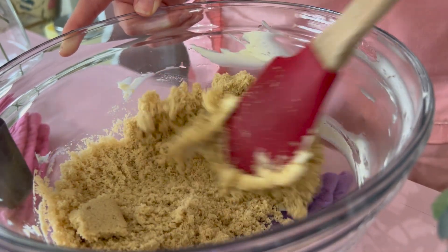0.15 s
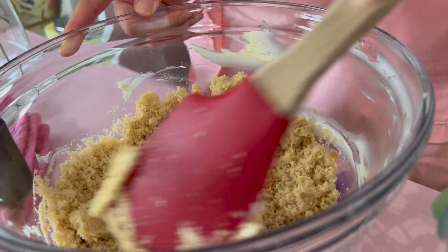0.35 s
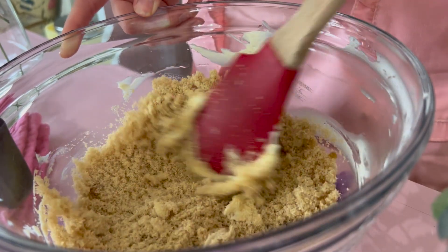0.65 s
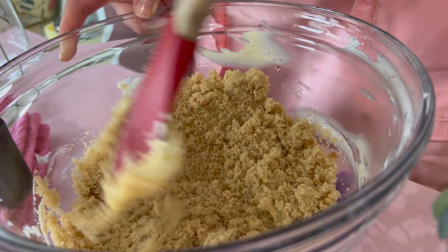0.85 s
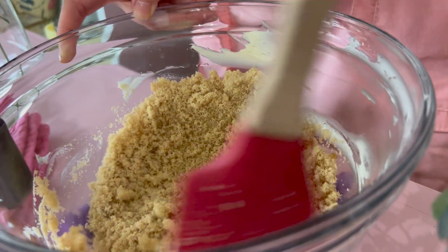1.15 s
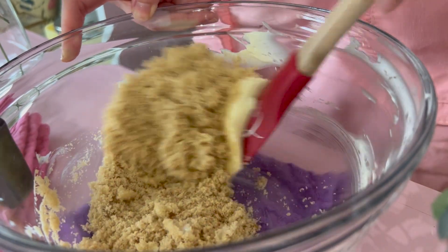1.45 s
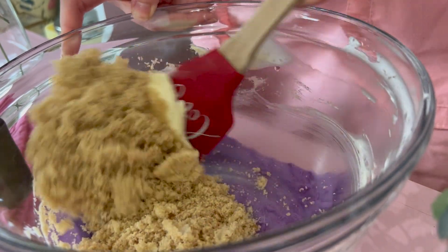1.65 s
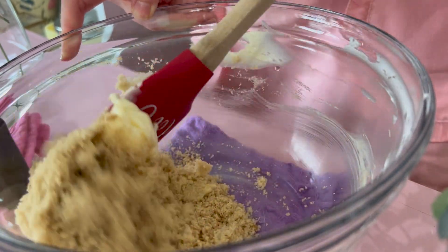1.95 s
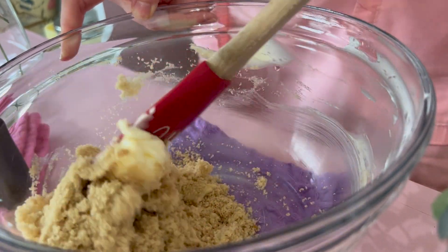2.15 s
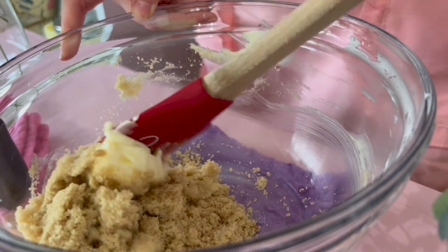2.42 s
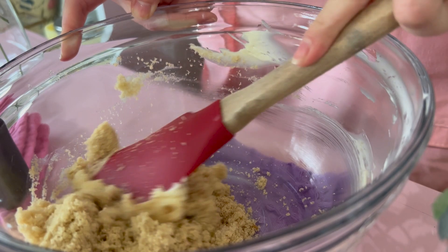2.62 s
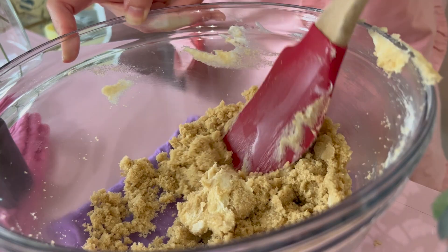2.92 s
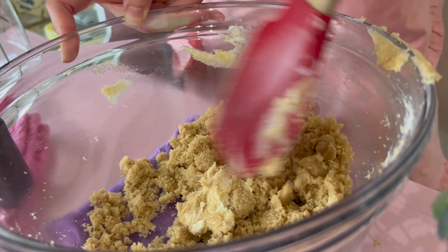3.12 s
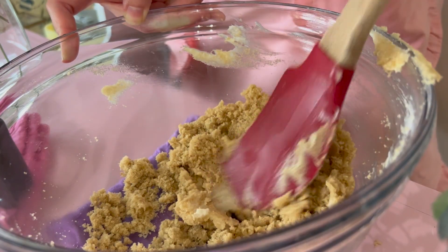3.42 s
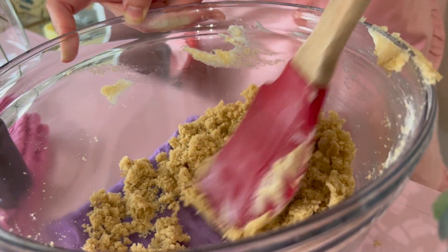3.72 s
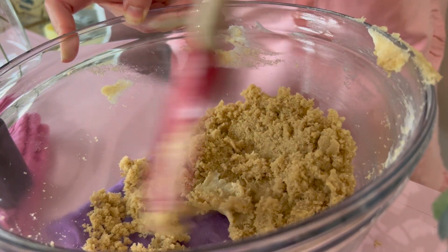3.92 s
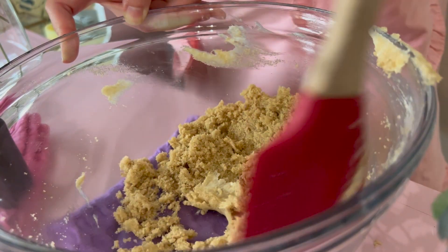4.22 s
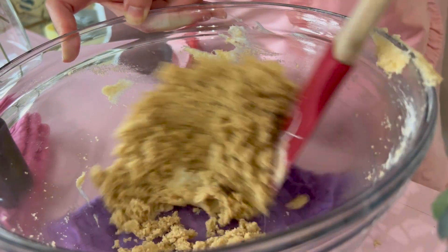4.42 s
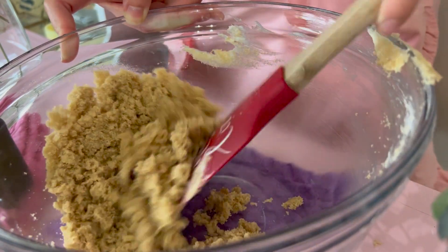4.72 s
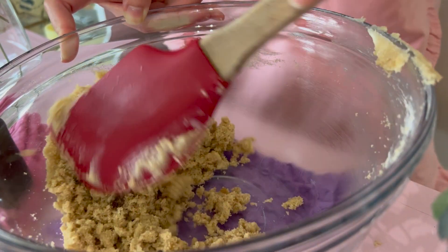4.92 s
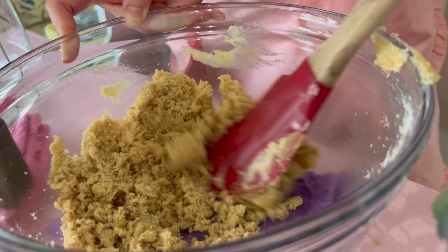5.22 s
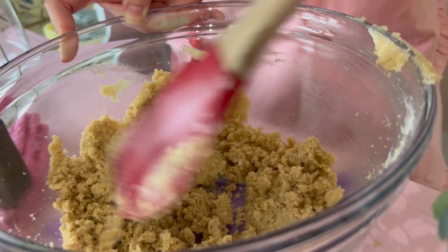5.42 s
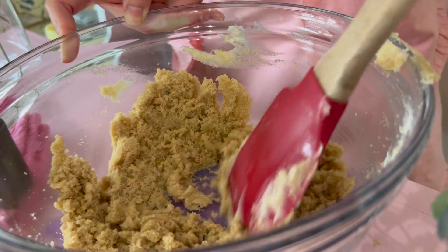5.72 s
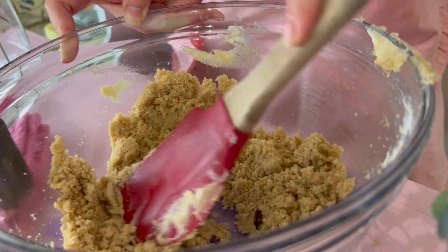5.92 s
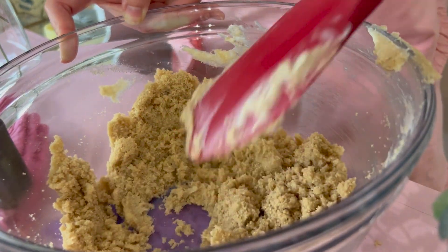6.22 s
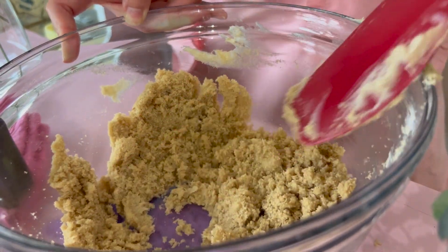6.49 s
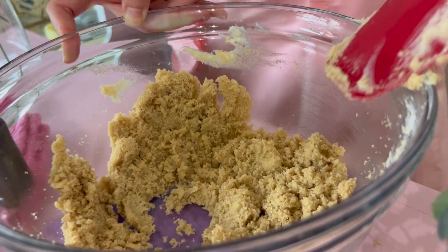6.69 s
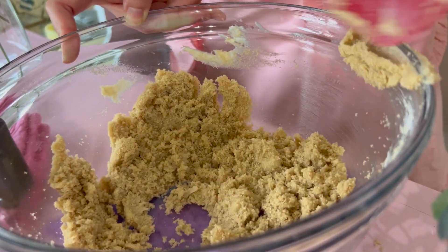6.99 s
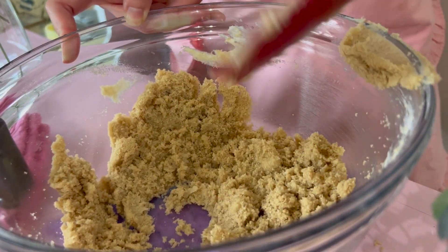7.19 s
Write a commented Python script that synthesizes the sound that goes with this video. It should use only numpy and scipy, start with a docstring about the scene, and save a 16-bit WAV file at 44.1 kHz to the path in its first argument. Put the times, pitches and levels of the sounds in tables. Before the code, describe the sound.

A silicone spatula grinds gritty butter and sugar around a glass bowl, with sharp ringing knocks and a rim scrape, over a low appliance hum.

```python
"""A kitchen appliance hums throughout, as narrow bands of noise, while a silicone spatula stirs butter and
brown sugar in a glass bowl. From the start, pushes and two long sweeps grind crystals on the glass: they
hiss, rub and click, trapped air rings, and the bowl sings faintly. Knocks add a crack, a thud and a ringing
bowl; one rebounds. Late on, the blade slips along the rim as it is wiped, and a last knock ends the scene."""
import sys
import numpy as np
from scipy import signal
from scipy.fft import rfft, irfft
from scipy.io import wavfile
from scipy.ndimage import uniform_filter1d

SR = 44100
rng = np.random.default_rng(int(sys.argv[2]) if len(sys.argv) > 2 else 0)


def bounce(signal):
    """Save signal as a 16-bit WAV file at the path given by the first command-line argument."""
    frames = np.transpose(np.atleast_2d(signal))
    limited = np.clip(frames, -1, 1)
    pcm = np.round(limited * 32767).astype(np.int16)
    wavfile.write(sys.argv[1], SR, pcm)


N = 324135
TIME = np.arange(N) / SR  # seconds

# The room's steady noise, its colour: [pitch_hz, level_db per Hz]; then its overall level
ROOM_COLOUR = [(15, -13), (45, -8), (130, -3.5), (260, -14.5), (480, -29.5), (800, -43), (2100, -41),
               (2900, -50.5), (15500, -60)]
ROOM_DB = -50
# The appliance's wavering hum: [pitch_hz, half_width_hz, level_db]
HUM = [(51.17, 5.7, -50), (65.07, 2.1, -51), (117.13, 3.5, -50.5), (174.44, 4, -59), (239.3, 4.86, -59.5)]

# Pushes of the blade through the sugar; the one at 1.563 s is the end of the first sweep.
# The length includes the attack, and rub and song are relative to the push:
# [start_s, attack_s, length_s, force_db, swell_db from start to end, rub_db, song_db]
PUSHES = [(-.02, 0.016, 0.11, -72.5, 10, 4.5, -6), (0.269, 0.11, 0.24, -71.5, 8, 6.5, -8),
          (0.539, 0.077, 0.069, -68, 2, 8.5, -20), (0.847, 0.0079, 0.023, -63, -2, -1.5, -8),
          (1.563, 0.096, 0.3, -63.5, -16, -3.5, -3.5), (1.877, 0.02, 0.16, -68.5, 13.5, -14, -9),
          (2.069, 0.071, 0.29, -64, -8, -34, -38), (2.398, 0.016, .13, -76, 33.5, -2, -13),
          (2.566, 0.03, 0.19, -65.5, -3, -1, -18), (2.84, 0.012, 0.03, -67.5, 5, 4, -11),
          (3.187, 0.0089, 0.19, -63.5, 0, -8, -27), (3.555, 0.038, 0.031, -62, 1, -8, -7),
          (3.633, 0.023, 0.093, -65, 0, -3.5, -11), (3.946, 0.0084, 0.021, -58, -4.5, -5.5, -19),
          (4.608, 0.03, 0.22, -76, -7.5, 1.5, -3), (4.859, 0.034, 0.051, -72.5, 2, 0, -1.5),
          (4.938, 0.061, 0.26, -62, -3, -1, -12), (5.398, .025, 0.052, -63.5, 6.5, -4.5, -28),
          (5.486, 0.076, 0.14, -60, -5, -3.5, -4.5), (5.825, 0.038, 0.041, -65, -4, 4, -8),
          (5.894, 0.019, 0.066, -65.5, 6, -5, -9), (7.068, 0.024, 0.063, -72, 10, -32, -25)]
# Two long sweeps round the wall, one curve each: [time_s, force_db]
SWEEPS = [
    [(0.88, -66), (0.98, -55), (1.068, -56.5), (1.106, -52), (1.308, -57), (1.38, -52.5), (1.518, -56.5),
     (1.575, -58.5)],
    [(4.06, -67), (4.118, -57.5), (4.302, -58), (4.392, -55), (4.474, -55.5), (4.546, -63.5), (4.6, -73)],
]
# The tone of each sweep, relative to its force: [rub_db on the wall, song_db of the glass]
SWEEP_TONE = [(-6, -40), (-6.5, -12.5)]
# Pushes and sweeps die away alike once the hand stops, down to the faint rustle of the resting blade
RELEASE_DB_PER_S, REST_DB = 291, -101.5

# Colours of the grinding crystals and of the dull rub: [pitch_hz, level_db per Hz]
HISS_COLOUR = [(1500, -9), (2700, 2), (6200, -1), (7600, 2.5), (9300, 4.5), (10500, -1), (15500, 0)]
RUB_COLOUR = [(200, -23), (480, 0.5), (850, -12), (1150, -2.5), (2500, -6), (4500, -19)]
# The gap between blade and wall colours the rub
HOLLOW_HZ, HOLLOW_DB = 1350, -13.5

# Short dry clicks: crystals cracking, and at 2.658 s the rebound of the knock: [time_s, peak_db]
CLICKS = [(.469, -36), (1.152, -33), (1.227, -34), (1.271, -28.5), (1.598, -29), (2.658, -26), (4.724, -45),
          (5.454, -39)]
# Colour of the clicks: [pitch_hz, level_db per Hz]
CLICK_COLOUR = [(700, -4), (4000, 3), (8000, 8), (12000, 8), (16000, -10)]
# Air trapped against the wall by the bending blade, and at 3.959 s a brief tick of the blade's edge: [time_s,
# half_length_s, pitch_hz, level_db]
POCKETS = [(1.027, 0.026, 1340, -59.5), (1.234, .08, 1280, -57), (3.959, 0.0073, 1950, -55.5),
           (4.159, .02, 2820, -64), (4.205, 0.043, 2090, -63), (4.284, 0.057, 1330, -57),
           (4.383, 0.029, 1670, -58)]

# Ways the glass bowl can ring (its modes): [pitch_hz, t60_s to fall 60 dB, knocked_db, scraped_db]
BOWL = [(501, .45, -1, -14), (607, .35, -3.5, -8), (1374, .9, -2.5, -13), (2406, .48, -8, -6),
        (3705, .7, -15, -.5), (3830, .03, -15, -1), (5258, .6, -13, -6), (7025, .6, -22, -7),
        (7292, .5, -22, -6.5), (8210, .05, -22, -6), (9000, .3, -24, -11), (9515, .4, -23, -6),
        (11230, .08, -20, -1)]
# Loss of the ring while the blade presses, flutter of the modes, and the ring's later, quick fall
WIPE_LOSS_DB_PER_S, FLUTTER_DB, FALL_DB_PER_CYCLE = 1150, 4, .25

# Knocks on the bowl, the ring level before the ring's own scaling:
# [time_s, crack_db, ring_db, thud_db, thud_hz, free_s until the ring falls away quickly]
KNOCKS = [(1.551, -62, -73, -42, 400, .03), (2.6353, -21, -26, -31, 520, .13),
          (6.323, -40, -46, -30.5, 243, 0.25), (7.3415, -33, -30, -27, 480, .1)]
# Colours of the knock's hard crack and of its clatter: [pitch_hz, level_db per Hz]
CRACK_COLOUR = [(300, 10.5), (650, 14.5), (1150, 7.5), (1700, -1), (3200, 4.5), (4500, -8.5), (9000, -17),
                (16000, -44)]
CLATTER_COLOUR = [(130, 18), (360, 4), (550, 15.5), (760, 5), (4000, -10)]

# Pressure of the blade wiped on the rim, before the ring and dry gains: [time_s, drive_db]
WIPE = [(6.315, -70), (6.33, -41.5), (6.39, -58), (6.47, -61), (6.55, -50.5), (6.62, -60.5), (6.78, -54.5),
        (6.86, -62.5), (6.91, -87)]
# Slips on the rim, and at 2.658 s the knock's rebound, before the same gains: [time_s, peak_db]
SLIPS_AND_REBOUND = [(2.658, -30), (6.322, -29), (6.348, -34), (6.3554, -34), (6.3714, -36.5),
                     (6.404, -34.5), (6.4115, -41), (6.4506, -37), (6.503, -38.5), (6.5424, -38),
                     (6.5512, -35.5), (6.5674, -35.5), (6.589, -34), (6.797, -37)]
# Colours of these brief contacts and of the dry, gritty wipe: [pitch_hz, level_db per Hz]
CONTACT_COLOUR = [(500, -3), (2500, 5), (12000, 8.5), (16000, -6)]
GRIT_COLOUR = [(560, 4), (900, -8), (2400, 1.5), (4300, -4), (6000, -13), (8000, -0.5), (15000, -14)]

# How alike noise is at the two microphones: [pitch_hz, likeness from 0 to 1]
LIKENESS = [(50, 1), (250, 0.82), (700, 0.51), (6000, 0.53), (12000, 1)]
# Level difference of the pair: [pitch_hz, left_minus_right_db]
LEAN = [(60, -1), (400, -4), (2400, -4), (4400, -5), (10000, -0.5)]
# Phase difference of the pair: [pitch_hz, left_lead_radians]
PORT_PHASE = [(0, 0.0), (2000, 0.1), (3000, -1.2), (4000, -0.2), (8900, 0.1), (10100, 3.0), (10800, 3.2),
              (11900, 6.1), (12600, 6.5), (13600, 9.4), (14200, 9.5), (15300, 12.5)]
EDGE_HZ = 15900  # upper band limit


def amp(db):
    """Turns decibels into a gain."""
    return 10 ** (np.asarray(db) / 20)


def unit(x):
    """Scales a sound to an average (rms) level of 1."""
    return x / np.sqrt(np.mean(x ** 2) + 1e-20)


def read(points, hz):
    """Reads a table between its points, along a log-frequency axis."""
    table_hz, value = np.transpose(points)
    return np.interp(np.log(hz + 1), np.log(table_hz + 1), value)


def follow(curve):
    """Reads a curve over time at every sample."""
    time_s, value = np.transpose(curve)
    return np.interp(TIME, time_s, value)


def add(mix, start_s, sound):
    """Mixes a sound in at its start time, cutting off what runs past the end."""
    part = mix[:, round(start_s * SR):][:, :sound.shape[-1]]
    part += sound[..., :part.shape[1]]


def colour(x, points):
    """Makes some pitches louder and others softer, following a colour table."""
    size = x.shape[-1]
    gain = amp(read(points, np.fft.rfftfreq(size, 1 / SR)))
    return irfft(rfft(x) * gain, size)


def noise(size=N):
    """White noise at two microphones, alike to a degree that depends on pitch."""
    first, other = rfft(rng.standard_normal((2, size)))
    same = np.clip(read(LIKENESS, np.fft.rfftfreq(size, 1 / SR)), 0, 1)
    second = same * first + np.sqrt(1 - same ** 2) * other
    return irfft(np.array([first, second]), size)


def waver(hz, size=N):
    """A slow random wander of rms 1, with little motion faster than about hz."""
    slow = np.exp(-(np.fft.rfftfreq(size, 1 / SR) / hz) ** 2)
    return unit(irfft(rfft(rng.standard_normal(size)) * slow, size))


def grains(per_s, spread_db):
    """Tiny fractures at random times, mostly small and a few large."""
    strength = amp(spread_db * np.minimum(rng.exponential(1, N), 4))
    happens = rng.random(N) < per_s / SR
    return unit(strength * happens * rng.choice([-1, 1], N))


def shifting(x, patchy_db):
    """Clumps passing under the blade favour now one band of pitch, now another."""
    spectrum = signal.stft(x, nperseg=512)[2]
    patches = rng.standard_normal(spectrum.shape[1:])
    patches = uniform_filter1d(patches, size=7, axis=0)  # blend neighbouring pitches
    patches = uniform_filter1d(patches, size=12, axis=1)  # blend neighbouring moments
    return signal.istft(spectrum * amp(patchy_db * unit(patches)), nperseg=512)[1][:, :N]


def resonate(x, hz, width_hz):
    """A steep resonance that favours one pitch, brought to rms 1."""
    size = x.shape[-1]
    offset = (np.fft.rfftfreq(size, 1 / SR) - hz) / width_hz
    return unit(irfft(rfft(x) / (1 + 2j * offset) ** 2, size))


def glass(blade_loss_db, axis, flutter_db=0, free_s=1):
    """The bowl's modes flutter and fade, then fall away quickly after free_s, the high ones fastest."""
    t = TIME[:SR // 2]
    ring = 0
    for mode in BOWL:
        hz, t60 = mode[:2]
        # the lowest modes push at one microphone while they pull at the other
        apart = 1.9 if hz < 1000 else .2  # radians
        flutter = flutter_db * waver(hz=40, size=len(t)) * min(hz / 2400, 1)  # dB
        phase = np.array([[0], [apart]]) + flutter / 10
        ringing_loss_db = (60 / t60 + blade_loss_db) * t
        late_loss_db = FALL_DB_PER_CYCLE * hz * np.maximum(t - free_s, 0)
        level = amp(mode[axis] + flutter - ringing_loss_db - late_loss_db)
        ring = ring + level * np.cos(2 * np.pi * hz * t + phase)
    return ring


def excite(drive, ring):
    """Every moment of the drive starts a ring, whose energy on the left is scaled to 1."""
    return signal.fftconvolve(np.atleast_2d(drive), ring / np.linalg.norm(ring[0]), axes=1)[:, :N]


def burst(points, decay_s):
    """One short contact: a coloured puff, nearly the same on both sides, whose peak is near 1."""
    t = TIME[:4096]
    puff = rng.standard_normal(len(t)) + 0.023 * rng.standard_normal((2, len(t)))
    return .5 * unit(colour(puff, points)) * np.exp(-t / decay_s)


def appliance():
    """Narrow, wavering bands of hum, cut from noise, over the room's steady noise."""
    out = amp(ROOM_DB) * unit(colour(noise(), ROOM_COLOUR))
    hz = np.fft.rfftfreq(N, 1 / SR)
    air = rfft(noise())
    for centre_hz, half_width_hz, db in HUM:
        band = air / (1 + ((hz - centre_hz) / half_width_hz) ** 4)
        out += amp(db) * unit(irfft(band, N))
    return out


def push(start, attack, length, db, swell_db):
    """The force of one push: attack, a hold that swells or sags, release."""
    age = TIME - start
    hold_db = db + swell_db * (np.clip(age / length, 0, 1) - .5)
    release_db = RELEASE_DB_PER_S * np.maximum(age - length, 0)
    return np.clip(age / attack, 0, 1) * amp(hold_db - release_db)


def sweep(curve):
    """The force along one sweep curve, fading at both ends."""
    outside_s = abs(TIME - np.clip(TIME, curve[0][0], curve[-1][0]))
    return amp(follow(curve) - RELEASE_DB_PER_S * outside_s)


def hand():
    """All pushes and sweeps, added up as the gains of the hiss, the rub and the song of the glass."""
    strokes = [(push(*row[:5]), *row[5:]) for row in PUSHES]
    strokes += [(sweep(curve), *tone) for curve, tone in zip(SWEEPS, SWEEP_TONE)]
    force, rub, sing = amp(REST_DB) * np.ones((3, N))
    for stroke, rub_db, sing_db in strokes:
        force = force + stroke
        rub = rub + stroke * amp(rub_db)
        sing = sing + stroke * amp(sing_db)
    return force, rub, sing


def stirring(force, sing, hiss_db=3.0, grit=0.59, judder_db=1.0):
    """Crystals grind between blade and glass and make the bowl sing faintly."""
    level_db = 20 * np.log10(force)
    judder = amp(judder_db * waver(hz=66))
    crunch = unit(noise() + grit * grains(per_s=1500, spread_db=4.0))
    hiss = unit(shifting(colour(crunch, HISS_COLOUR), patchy_db=2.1))
    treble_only = signal.butter(2, 9000, fs=SR, btype="high", output="sos")
    top = signal.sosfiltfilt(treble_only, hiss)
    hiss = hiss + top * (amp(np.clip(level_db + 61.5, -5, 3)) - 1)  # harder strokes are brighter
    song = excite(sing * judder * crunch, glass(blade_loss_db=400, axis=3))
    return amp(hiss_db) * force * judder * hiss + song


def rubbing(force, broad_db=0, width_hz=400):
    """The blade's dull, crumbly rub, a little hollow from the gap between blade and wall."""
    crumbs = noise() + .5 * grains(per_s=700, spread_db=3)
    rub = unit(shifting(colour(crumbs, RUB_COLOUR), patchy_db=3.5))
    hollow = resonate(rub, HOLLOW_HZ, width_hz)
    return force * (amp(broad_db) * rub + amp(HOLLOW_DB) * hollow)


def clicks():
    """Cracking crystals and one knock's rebound click, each a very short puff of noise."""
    out = np.zeros((2, N))
    for start_s, db in CLICKS:
        add(out, start_s, amp(db) * burst(CLICK_COLOUR, decay_s=.0009))
    return out


def pockets(width_hz=260):
    """Each pocket of air rings briefly with the crystals that grind beside it; the blade's edge ticks once in
    the same way."""
    out, t = np.zeros((2, N)), TIME[:SR] - .5
    for middle_s, half_s, hz, db in POCKETS:
        swell = np.exp(-(t / half_s) ** 2)
        add(out, middle_s - .5, amp(db) * swell * resonate(noise(size=SR), hz, width_hz))
    return out


def knocks(clatter_db=-15):
    """A crack, a thud of the bowl on the counter and the glass ringing, then falling away quickly."""
    out, t = np.zeros((2, N)), TIME[:SR // 2]
    # the hard contact wakes the high modes for a moment
    clink = 0.13 * glass(WIPE_LOSS_DB_PER_S, axis=3)
    for start_s, crack_db, ring_db, thud_db, thud_hz, free_s in KNOCKS:
        ring = 0.16 * glass(0, axis=2, flutter_db=FLUTTER_DB, free_s=free_s)
        quick_fall = amp(-480 * np.maximum(t - free_s, 0))  # 480 dB per second
        clatter_fade = amp(clatter_db - 60 * t / 0.65)
        clatter = quick_fall * clatter_fade * unit(colour(noise(size=len(t)), CLATTER_COLOUR))
        thud = np.sin(2 * np.pi * thud_hz * t) * np.exp(-t / 0.007)
        add(out, start_s, amp(ring_db) * (ring + clatter) + amp(thud_db) * thud + amp(crack_db) * clink)
        add(out, start_s, amp(crack_db) * burst(CRACK_COLOUR, decay_s=.0055))
    return out


def wiping_and_rebound(ring_db=-5, dry_db=-3.5, slip_db=-4):
    """The gritty blade slips over the rim; each slip, and a knock's rebound, wakes its own mix of high modes."""
    touching = (TIME > WIPE[0][0]) & (TIME < WIPE[-1][0])
    grit = unit(noise() + grains(per_s=1500, spread_db=3.5))
    drive = touching * amp(follow(WIPE)) * grit
    ring = excite(drive, glass(WIPE_LOSS_DB_PER_S, axis=3))
    ring = amp(ring_db) * shifting(ring, patchy_db=3.5)
    for start_s, db in SLIPS_AND_REBOUND:
        contact = amp(db) * burst(CONTACT_COLOUR, decay_s=.002)
        add(drive, start_s, contact)
        contact_glass = glass(WIPE_LOSS_DB_PER_S, axis=3, flutter_db=FLUTTER_DB)
        add(ring, start_s, amp(slip_db) * excite(contact, contact_glass))
    return ring + amp(dry_db) * colour(drive, GRIT_COLOUR)


def kitchen(x, t60=0.31, wet_db=-15):
    """Adds a short, diffuse tail of fading noise from walls and cupboards."""
    t = TIME[:SR // 2]
    tail = rng.standard_normal((2, len(t))) * amp(-60 * t / t60) * (t > .004)
    return x + amp(wet_db) * excite(x, tail)


def scene():
    """The work in the bowl, in the humming kitchen."""
    force, rub, sing = hand()
    strokes = stirring(force, sing) + rubbing(rub)
    bowl_work = strokes + clicks() + pockets() + knocks() + wiping_and_rebound()
    return appliance() + kitchen(bowl_work)


def record(dry):
    """The two microphone ports differ in level and phase; then the highest treble is cut off."""
    size = N + 4096  # spare room, so that the end does not wrap round to the start
    hz = np.fft.rfftfreq(size, 1 / SR)
    lean = amp(read(LEAN, hz) / 2)
    ports = np.array([lean, np.exp(-1j * read(PORT_PHASE, hz)) / lean])
    heard = irfft(rfft(dry, size) * ports, size)[:, :N]
    band_limit = signal.firwin(511, EDGE_HZ, window=("kaiser", 9), fs=SR)
    return signal.oaconvolve(heard, band_limit[None], "same")


dry = scene()
out = record(dry)
bounce(out)
```